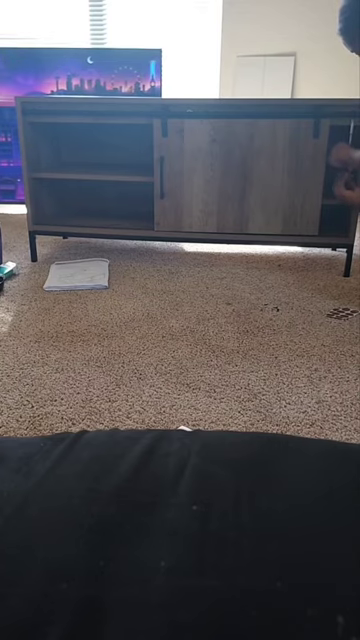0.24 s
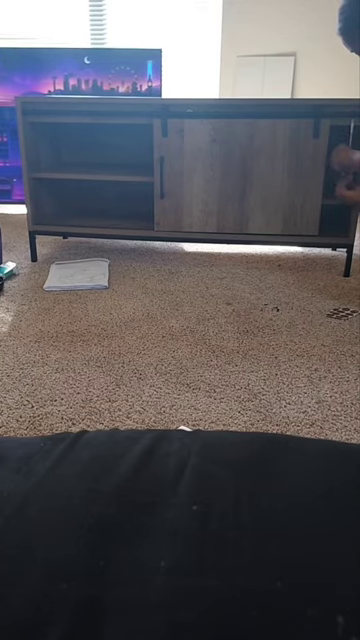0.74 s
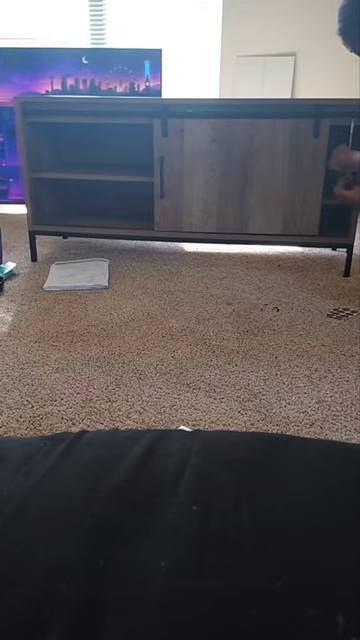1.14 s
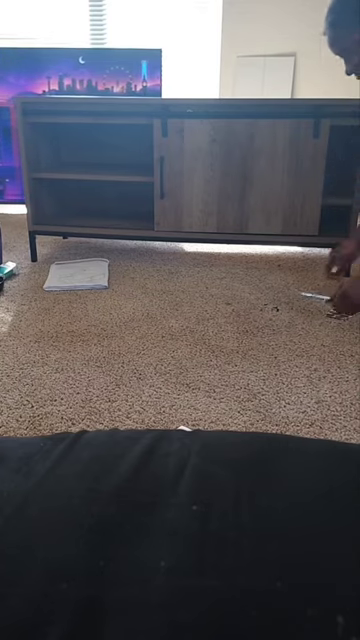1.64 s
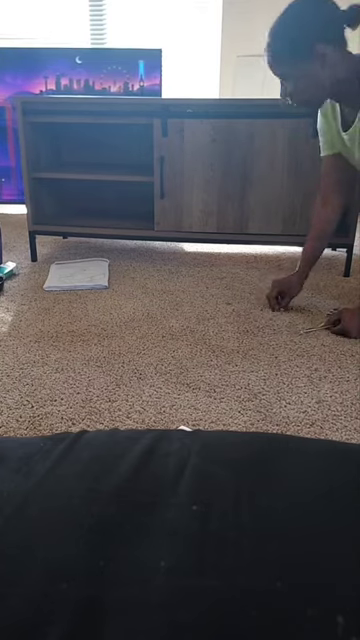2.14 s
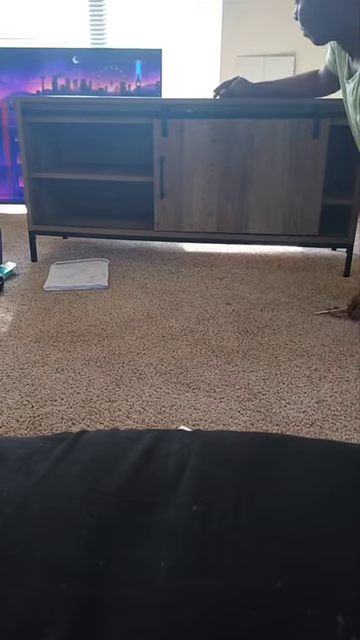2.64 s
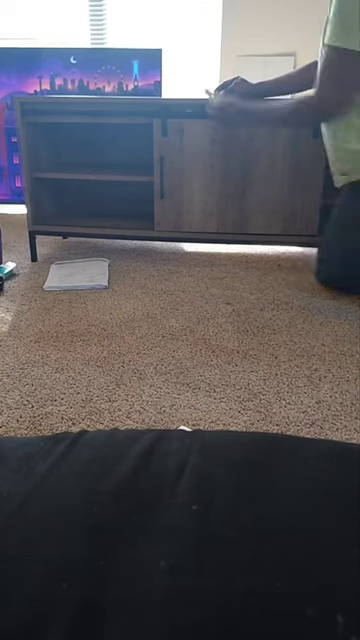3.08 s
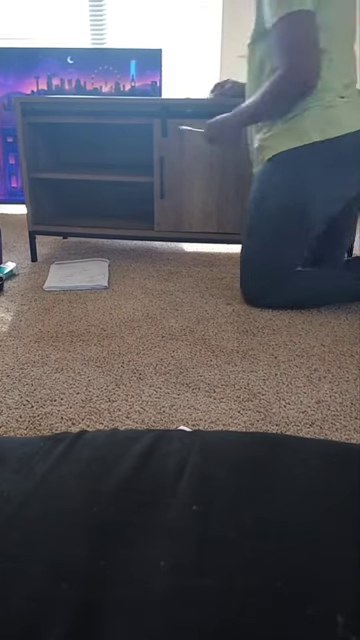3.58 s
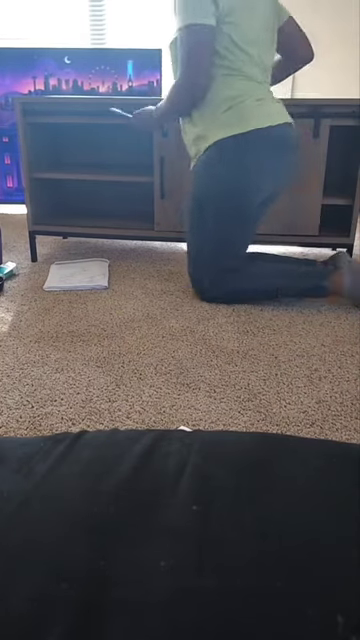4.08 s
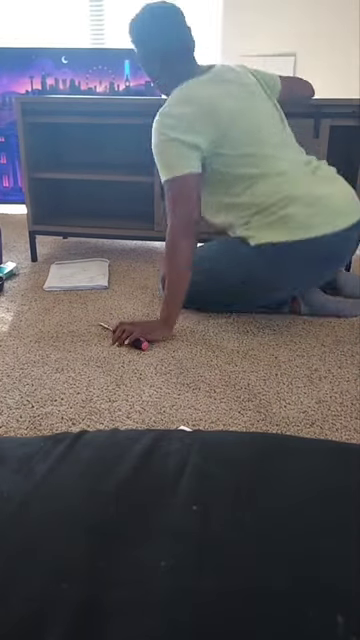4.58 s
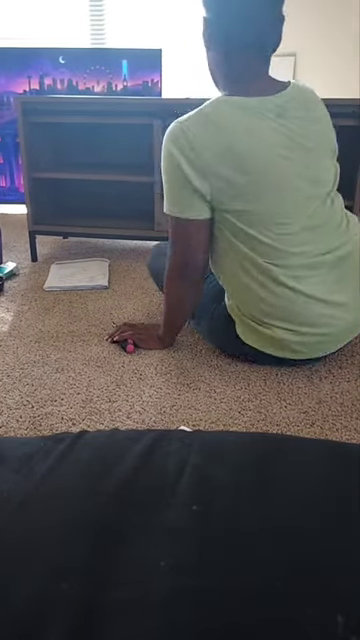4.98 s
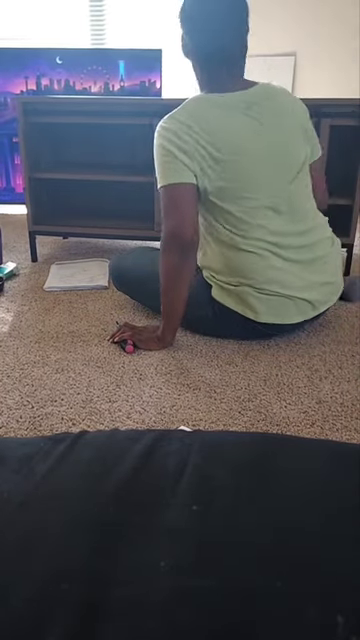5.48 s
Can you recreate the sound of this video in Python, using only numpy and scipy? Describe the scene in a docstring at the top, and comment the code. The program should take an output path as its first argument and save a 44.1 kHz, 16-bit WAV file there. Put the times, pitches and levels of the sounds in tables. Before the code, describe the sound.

Light clicks and clacks of tools and screws, then faint shuffling on carpet, over an air conditioner's low drone.

```python
"""Carpeted room, a phone's two microphones a few metres from a flat-pack cabinet.
From the start an air conditioner hums, blows and faintly whines, while someone gathers small parts
and tools that clack on each other and on the wooden top. Just before 3 s comes the busiest clatter,
with screws ticking, and the person starts to shuffle along. From there clothes and knees keep
brushing the carpet under scattered clacks, and the air conditioner runs on to the end."""
import sys
import numpy as np
from scipy import signal
from scipy.fft import rfft, irfft, next_fast_len
from scipy.io import wavfile
from scipy.ndimage import uniform_filter1d, map_coordinates

SR = 44100
rng = np.random.default_rng(int(sys.argv[2]) if len(sys.argv) > 2 else 0)


def dump_mix(stems):
    """Bounce the given channels to the path in sys.argv[1] as a 16-bit WAV at rate SR."""
    frames = np.atleast_2d(stems).T  # one column per channel
    limited = np.clip(frames, -1, 1)  # hard clip at full scale
    pcm = np.round(limited * 32767).astype(np.int16)
    wavfile.write(sys.argv[1], SR, pcm)


N = 252252

# parts clacking: t/s, level/dB, brightness/dB, gathering time/s, main resonance/Hz
CLACKS = [(0.231, -59, -3, 0.006, 4820), (.287, -51.5, 5, 0.011, 2580), (.701, -48, 0.5, 0.01, 1300),
          (1.031, -63, -3, 0.005, 5000), (1.165, -59, 6.5, 0.011, 3000), (1.253, -61.5, 0, 0.0075, 3140),
          (1.711, -59, 10.5, 0.007, 2860), (1.765, -51.5, 2, 0.012, 2400), (2.298, -57.5, 3, 0.012, 2770),
          (2.771, -53.5, 0, 0.007, 4470), (2.819, -52.5, 6.5, .007, 4300), (2.843, -44, 5, 0.0012, 3800),
          (2.849, -48, 10.5, .014, 3610), (2.91, -57.5, 7.5, .025, 3660), (3.086, -65.5, 16, .011, 4110),
          (3.344, -62.5, -8.5, 0.013, 3230), (3.886, -59, -3, .01, 4750), (4, -65, 1.5, 0.01, 4040),
          (4.467, -63.5, 5.5, 0.012, 3400), (4.996, -51.5, 1.5, 0.017, 1690),
          (5.397, -51.5, 3.5, 0.011, 3400), (5.62, -55.5, -7.5, 0.035, 3530),
          (5.67, -49.5, -7.5, 0.017, 3750)]
# colour of a clack: f/Hz, level/dB
CLACK_COLOUR = [(100, -17.5), (650, 9), (1200, -0.5), (1900, -0.5), (2500, 0), (4000, -2.5), (5400, -1.5),
                (6200, -12.5), (7500, -15), (9500, -19), (12200, -20), (15500, -33.5)]
# ticks of loose hardware: t/s, level/dB
SCREW_TICKS = [(0.3, -57), (1.731, -52), (1.771, -46.5), (2.503, -63), (2.785, -58.5), (2.855, -44.5),
               (2.896, -52), (2.923, -57.5), (3.096, -56.5), (3.148, -56), (4.906, -52)]
# strokes of clothes and knees over the carpet: middle t/s, length/s, level/dB
CLOTH_STROKES = [(0.01, 0.14, -61.5), (1.349, .12, -70), (3.14, 0.08, -66.5), (3.63, .06, -67),
                 (3.78, .16, -68.5), (4.398, 0.1, -64), (4.928, 0.25, -70), (5.702, .18, -64)]
# colour of cloth on the pile: f/Hz, level/dB
CLOTH_COLOUR = [(200, -24), (1000, 4), (4800, 0.5), (6500, -6), (11500, -11.5), (15500, -19)]
# stutters, heard as brief dips and phase jumps in the hum: t/s, phase jump/cycles
HUM_STUTTERS = [(1.128, -0.16), (1.6, 0.43), (3.797, -0.2), (4.957, -0.67), (5.152, 0.98), (5.2, 0.11)]
# the blower's broad rush: f/Hz, level/dB
RUSH_COLOUR = [(15, -13.5), (45, -8.5), (78, 1.5), (110, -1.5), (165, -12), (280, -5.5), (335, -16.5),
               (425, -13.5), (480, -27), (900, -29), (1420, -37.5), (2150, -45), (4800, -52), (6300, -58),
               (15500, -64)]
# duct resonances: f/Hz, half-width/Hz, level/dB
DUCT_MODES = [(228.1, 14, -4), (245, 23.6, -2.5), (372.6, 11.4, -7), (529, 20, -19.5), (547, 12, -15),
              (610, 21, -25.5), (1773, 150, -35)]
# moments where the low rumble happens to be louder: start t/s, length/s, level/dB
LOUDER_RUMBLE = [(0.163, 0.058, -30.5), (0.28, 0.024, -33), (0.634, 0.03, -28.5), (1.068, 0.054, -34.5),
                 (1.42, 0.056, -30.5), (1.628, 0.067, -31.5), (2.325, 0.077, -30), (2.583, 0.095, -31.5),
                 (2.792, 0.057, -29), (3.627, 0.033, -31), (4.402, 0.03, -31.5), (5.097, 0.044, -32),
                 (5.49, 0.12, -34)]
# lines of the motor's whine: f/Hz, level/dB
WHINE_LINES = [(733, -9), (858, 1), (1032, 2), (1205, 6.5), (2303, -9.5), (3063, -13), (3289, -15.5),
               (3603, -17.5), (3779, -18.5), (4054, -16), (4613, -11)]
# the room's reverberation: f/Hz, t60/s
ROOM_DECAY = [(200, 0.99), (2000, 0.31), (4500, 0.25), (8000, 0.25), (14000, 0.2)]
# likeness of the room's noise at the two microphones: f/Hz, correlation
MIC_LIKENESS = [(25, 0.48), (70, 0.6), (130, 1), (235, 0.18), (380, 0.06), (550, 0.04), (15000, 0.0034)]
# balance of the two microphones: f/Hz, left minus right/dB
MIC_BALANCE = [(25, -9), (80, -0.5), (170, -0.5), (220, -3), (270, -3), (500, -6.5), (700, 2.5), (1800, 1),
               (2400, 8), (5000, -1.5), (8500, 2), (14000, -0.5)]


def clacks(gain_db=1, spiky=0.4, ring_db=-5, ring_width_hz=740, ring_growth=0.55, usual_db=-51):
    """Each clack is a flurry of small contacts that gathers and settles, sounding a well damped part."""
    out, t = np.zeros((2, N)), np.arange(SR // 5) / SR
    for s, db, bright_db, gather_s, ring_hz in CLACKS:
        force = np.minimum(t / gather_s, np.exp(1 - t / gather_s))
        contacts = force * rng.standard_normal(len(t)) * np.exp(spiky * rng.standard_normal(len(t)))
        ring = (ring_hz, ring_width_hz, ring_db + ring_growth * (db - usual_db))  # louder rings more
        body = lambda hz: amp(along(CLACK_COLOUR, hz)) * (0.5 + resonances([ring], hz))
        hardness = lambda hz: amp(bright_db / (1 + (5500 / (hz + 1)) ** 4))  # harder lifts the treble
        clack = filtered(contacts, lambda hz: body(hz) * hardness(hz))
        at_mics = room(clack, direct=0.056)
        loudest_rms = np.sqrt(uniform_filter1d(np.mean(at_mics ** 2, axis=0), size=800).max())
        add(out, s, amp(db + gain_db) * at_mics / loudest_rms)
    return panned(pan_db=1) * out


def screw_ticks(decay_s=0.0027, edge_hz=7500, dull_hz=13000):
    """Screws touch: very short, treble only, reaching the microphones mostly direct."""
    out, t = np.zeros((2, N)), np.arange(SR // 20) / SR
    treble = lambda hz: 1 / (1 + (edge_hz / (hz + 1)) ** 4) / (1 + (hz / dull_hz) ** 4)
    for s, db in SCREW_TICKS:
        snap = filtered(np.exp(-t / decay_s) * rng.standard_normal(len(t)), treble)
        add(out, s, amp(db) * room(snap, direct=2.0))
    return out


def brushing(crawl_start_s=2.7, crawl_rise_s=0.3, crawl_db=-71.5, grain_db=0.4):
    """Cloth drags over the pile in small catches: single strokes, and a steady rustle once crawling."""
    crawl = amp(crawl_db) * np.clip((np.arange(N) / SR - crawl_start_s) / crawl_rise_s, 0, 1)
    strokes = sum(amp(db) * swell(s, length) for s, length, db in CLOTH_STROKES)
    fibres = unit(filtered(rng.standard_normal((2, N)), lambda hz: amp(along(CLOTH_COLOUR, hz))))
    catches = amp(grain_db * wobble(84))
    return np.hypot(crawl, strokes) * catches * panned(pan_db=1) * fibres


def compressor_hum(hum_hz=119.96, level_db=-27.5, flutter_db=0.61, left_lead_rad=0.66, jump_s=0.011):
    """A drone at twice the mains rate; a standing wave sets its level and phase at each microphone."""
    t = np.arange(N) / SR
    tone = np.exp(2j * np.pi * hum_hz * t)
    for s, jump in HUM_STUTTERS:
        after = .5 + .5 * np.tanh((t - s) / jump_s)
        tone *= 1 - after + after * np.exp(2j * np.pi * jump)  # the level dips as the phase jumps
    mic_phase = left_lead_rad * np.array([[.5], [-.5]])
    at_mics = np.sqrt(2) * np.real(tone * np.exp(1j * mic_phase))
    return amp(level_db + flutter_db * wobble(14)) * panned(pan_db=-4.5) * at_mics


def blower(rush_db=-37, singing_db=-46, rumble_db=-39, uneven_db=3):
    """Air rushes through the unit; the duct's two lowest resonances rumble, the rest sing on."""
    rush = amp(rush_db) * room_noise(lambda hz: amp(along(RUSH_COLOUR, hz)))
    singing = amp(singing_db) * room_noise(lambda hz: resonances(DUCT_MODES[2:], hz))
    uneven = amp(rumble_db + uneven_db * wobble(12))  # narrow noise rises and falls by chance
    louder = sum(amp(db) * swell(s + length / 2, length) for s, length, db in LOUDER_RUMBLE)
    rumble = steadied(room_noise(lambda hz: resonances(DUCT_MODES[:2], hz)))
    return rush + singing + np.hypot(uneven, louder) * rumble


def motor_whine(level_db=-67, half_width_hz=4):
    """Faint, fuzzy motor lines scattered by the room."""
    lines = [(f, half_width_hz, db) for f, db in WHINE_LINES]
    return amp(level_db) * room_noise(lambda hz: resonances(lines, hz))


def room(x, direct, left_lag_s=0.0005):
    """A diffuse tail at each microphone, treble dying first; direct sound reaches the right one first."""
    hz, t, spectra = signal.stft(rng.standard_normal((2, SR // 2)), SR, nperseg=256)
    decay = amp(-60 * t / along(ROOM_DECAY, hz)[:, None])
    impulse = signal.istft(spectra * decay, SR, nperseg=256)[1]
    impulse /= np.linalg.norm(impulse[0])
    impulse[0, round(left_lag_s * SR)] += direct
    impulse[1, 0] += direct
    return signal.fftconvolve(x[None], impulse, axes=1)


def room_noise(response):
    """Noise of rms 1 filling the room: alike at both microphones in the bass, unrelated in the treble."""
    def mid_and_side(hz):
        spread = np.arccos(np.clip(along(MIC_LIKENESS, hz), -1, 1)) / 2
        return response(hz) * np.array([np.cos(spread), np.sin(spread)])
    mid, side = filtered(rng.standard_normal((2, N)), mid_and_side)
    return unit(microphones(np.array([mid + side, mid - side])))


def microphones(x):
    """The pair's left-right balance varies with frequency."""
    return filtered(x, lambda hz: panned(along(MIC_BALANCE, hz)))


def resonances(peaks, hz):
    """Summed gain of peaks given as f/Hz, half-width/Hz, level/dB."""
    return sum(amp(db) / (1 + ((hz - f) / width) ** 2) for f, width, db in peaks)


def swell(middle_s, length_s):
    """A smooth rise and fall in time, peak 1."""
    return np.exp(-2 * ((np.arange(N) / SR - middle_s) / length_s) ** 2)


def steadied(x):
    """Even out the slow swells of a narrow noise, keeping its fast flutter."""
    power = uniform_filter1d(np.mean(x ** 2, axis=0), size=3000)
    return x / np.sqrt(np.abs(power) + 1e-9)


def wobble(rate):
    """A smooth random curve, rate knots a second."""
    knots = rng.standard_normal(int(N * rate / SR) + 4)
    return map_coordinates(knots, [np.arange(N) * rate / SR])


def amp(db):
    """Decibels to gain."""
    return 10 ** (np.asarray(db) / 20)


def unit(x):
    """Scale to rms 1."""
    return x / np.sqrt(np.mean(x ** 2) + 1e-20)


def along(points, hz):
    """Read points of f/Hz, value on a log frequency axis."""
    f, values = np.transpose(points)
    return np.interp(np.log(hz + 1), np.log(f + 1), values)


def filtered(x, response):
    """Shape the spectrum of x with a gain that depends on frequency."""
    n = x.shape[-1]
    padded = next_fast_len(n + SR // 2)
    hz = np.fft.rfftfreq(padded, 1 / SR)
    return irfft(rfft(x, padded) * response(hz), padded)[..., :n]


def panned(pan_db):
    """Left and right gains for a level difference, left minus right."""
    return amp(np.array([[.5], [-.5]]) * pan_db)


def add(track, s, sound):
    """Mix a sound into the track at time s."""
    part = track[:, round(s * SR):][:, :sound.shape[-1]]
    part += sound[..., :part.shape[-1]]


def scene():
    """Handling sounds a few metres off, with the air conditioner filling the room."""
    handling = microphones(clacks() + screw_ticks() + brushing())
    return handling + compressor_hum() + blower() + motor_whine()


def record(dry, fade_s=0.002, top_hz=15700):
    """A very short fade at both ends avoids clicks; the phone keeps nothing above its band limit."""
    samples_from_edge = np.minimum(np.arange(N), np.arange(N)[::-1])
    fade = np.minimum(samples_from_edge / (fade_s * SR), 1)
    return filtered(dry * fade, lambda hz: hz < top_hz)


dry = scene()
out = record(dry)
dump_mix(out)
```